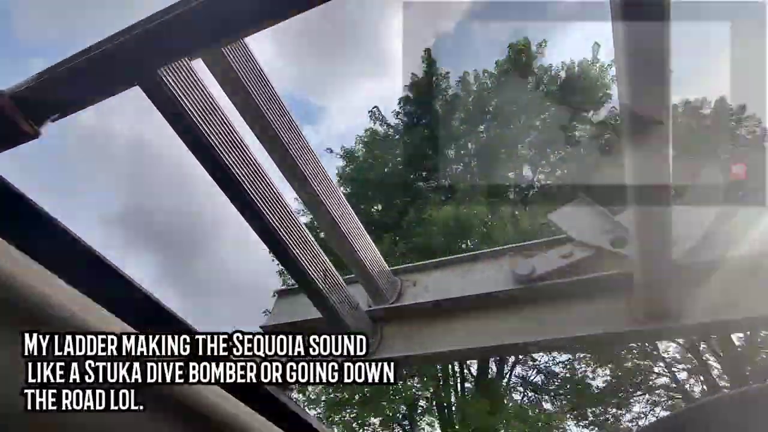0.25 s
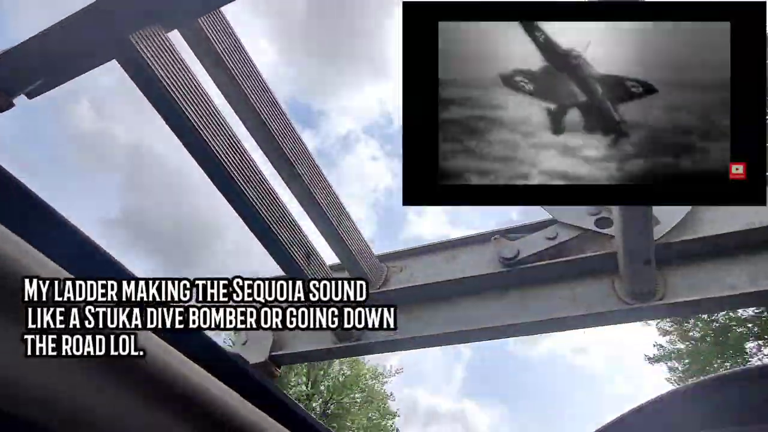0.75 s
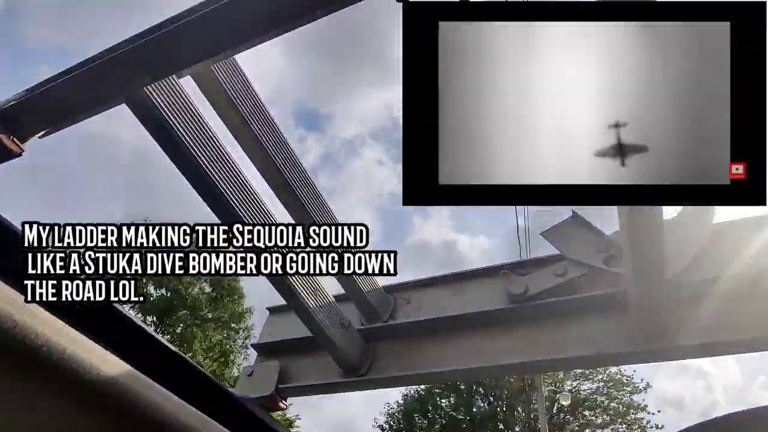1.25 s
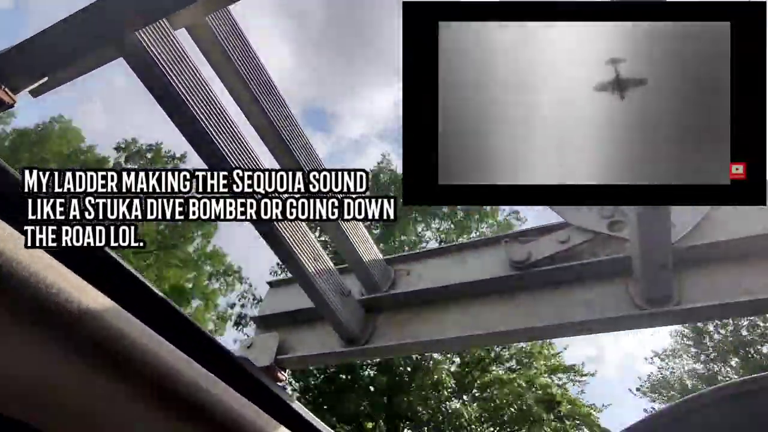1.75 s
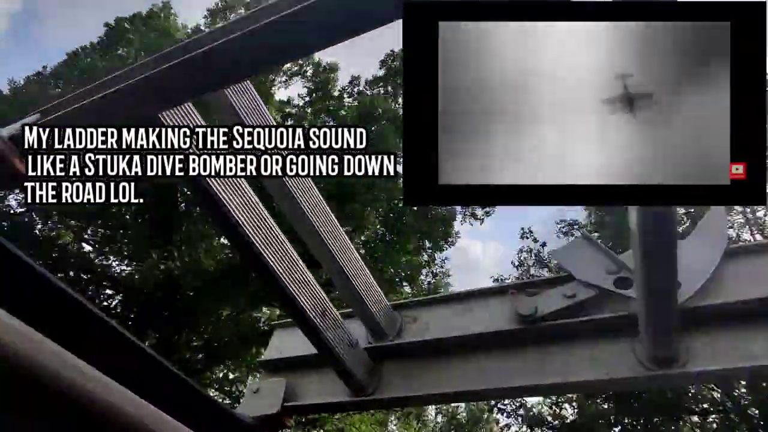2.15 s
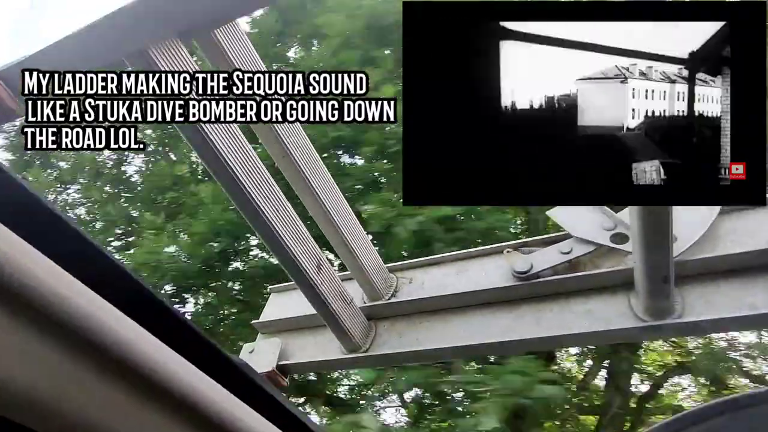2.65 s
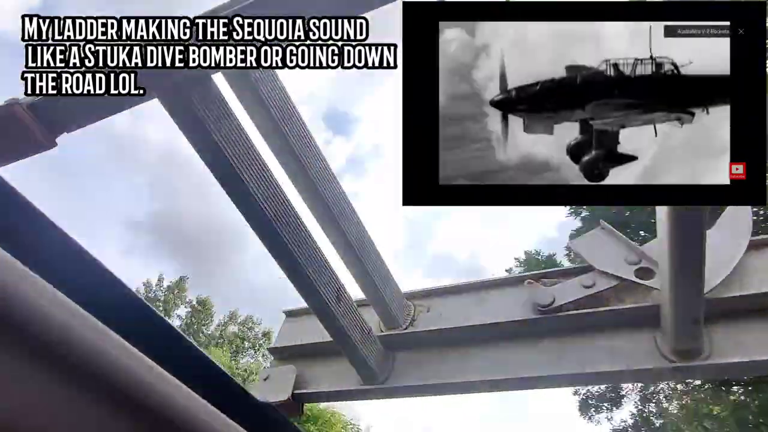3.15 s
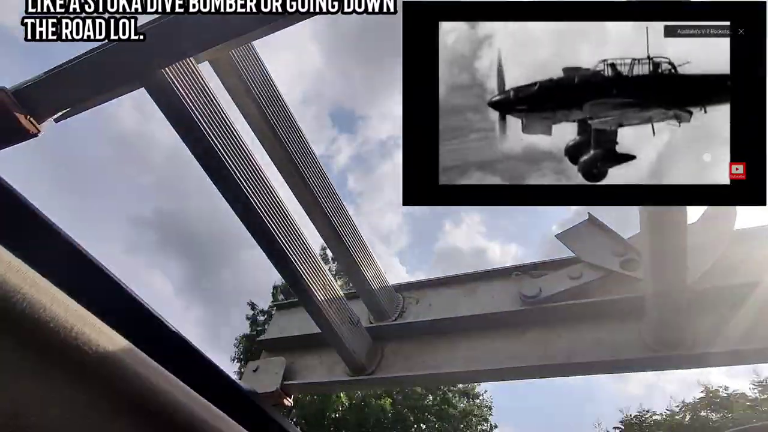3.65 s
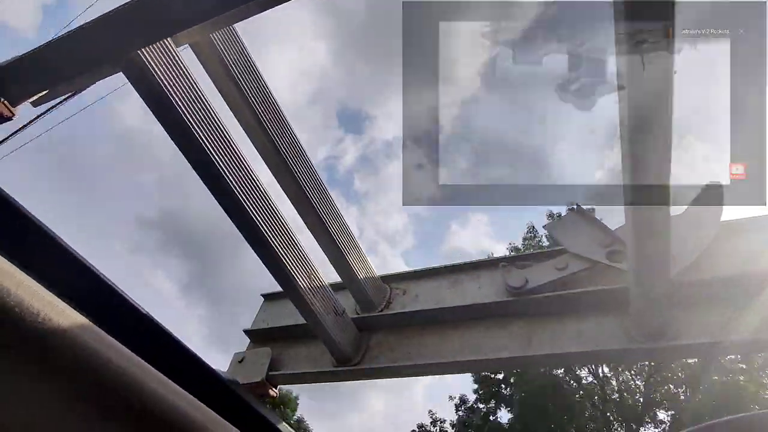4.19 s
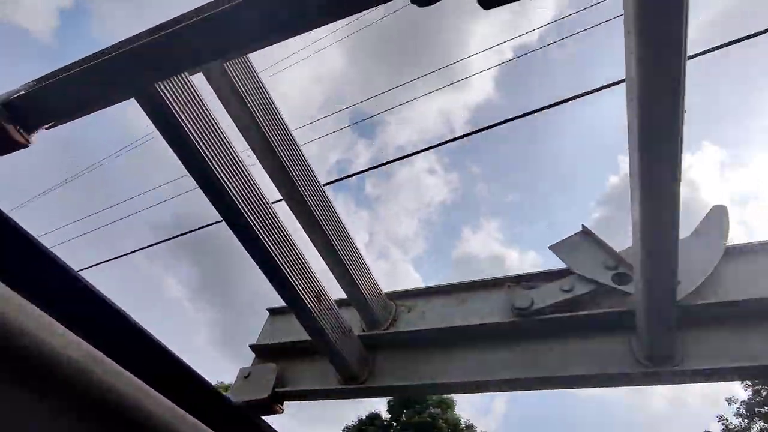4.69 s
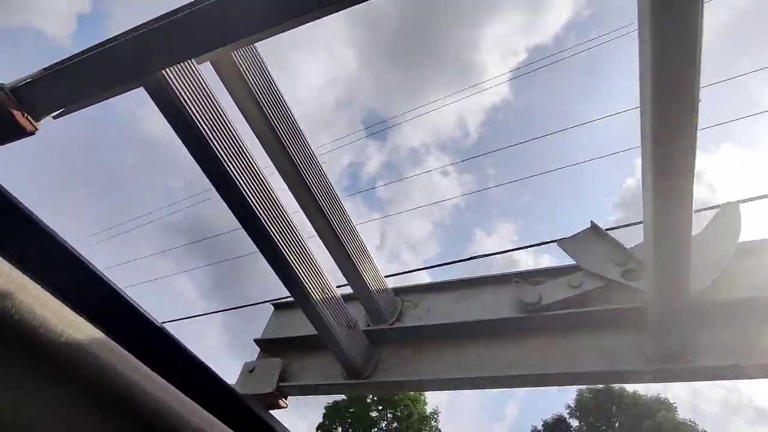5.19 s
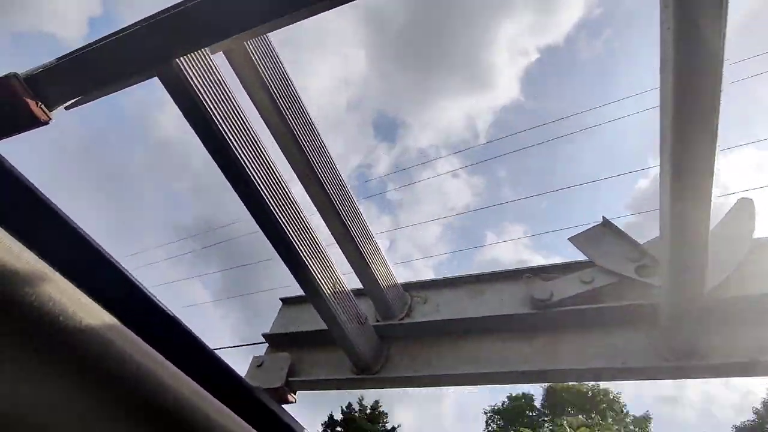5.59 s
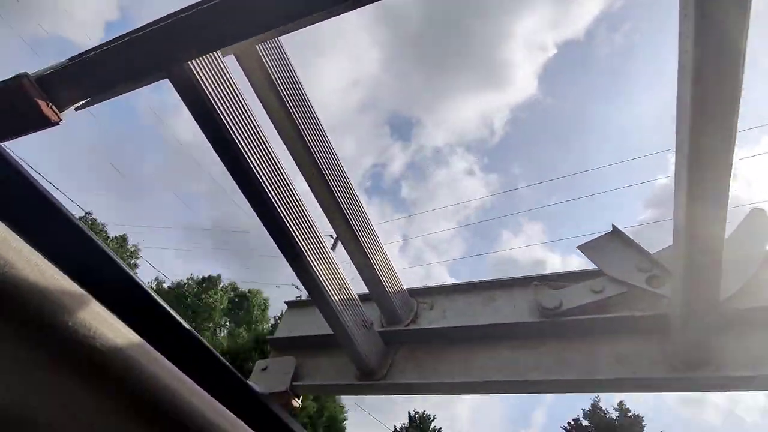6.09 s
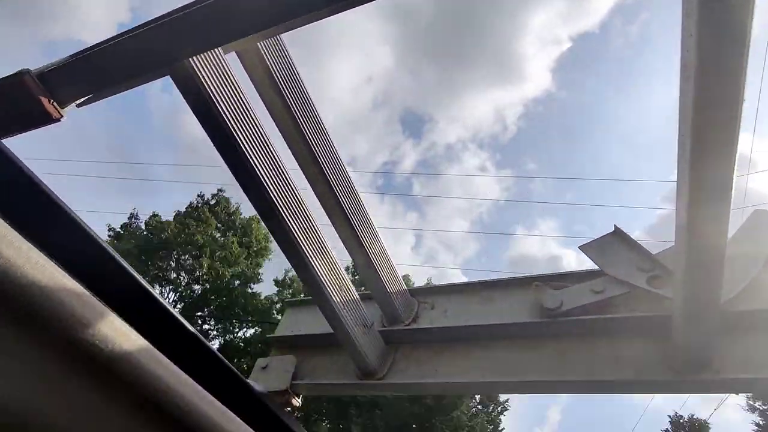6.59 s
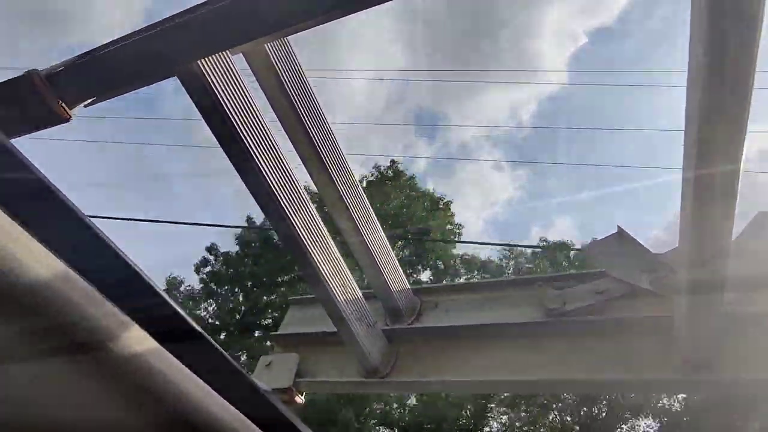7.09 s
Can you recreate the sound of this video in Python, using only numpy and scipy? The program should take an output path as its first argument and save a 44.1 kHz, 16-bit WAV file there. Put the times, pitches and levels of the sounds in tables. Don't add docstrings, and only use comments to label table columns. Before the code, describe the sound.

Inside a moving car with an open roof, wind blows across a metal ladder overhead and its hollow rungs hum a steady, slowly pulsing mid-pitched whistle. Air roars throughout over low engine drone and cabin boom. Gusts thump the phone's microphone from early on, the octave of the whistle flares around five seconds, and the heaviest slaps come last, mostly on the right.

```python
import sys
import numpy as np
from scipy import signal
from scipy.fft import rfft, irfft
from scipy.io import wavfile
from scipy.ndimage import uniform_filter1d

SR = 44100
rng = np.random.default_rng(int(sys.argv[2]) if len(sys.argv) > 2 else 0)


def attenuation_scalar(level_db):
    decades = np.asarray(level_db, float) / 20
    return 10 ** decades


def master_out(mix):
    frames = np.transpose(np.atleast_2d(mix))
    ceiling = np.clip(frames, -1, 1)
    pcm = np.round(ceiling * 32767).astype(np.int16)
    wavfile.write(sys.argv[1], SR, pcm)


N = 323635
TIME = np.arange(N) / SR
PORT_SIGN = np.array([[.5], [-.5]])


def curves(table):
    s, *columns = np.transpose(table)
    return [np.interp(TIME, s, c) for c in columns]


def unit(x):
    return x / np.sqrt(np.mean(x ** 2))


def walk(rate):
    k = int(SR / rate)
    held = np.repeat(rng.standard_normal(N // k + 1), k)
    return unit(uniform_filter1d(uniform_filter1d(held, k), k)[:N])


def port_walks(rate):
    return np.array([walk(rate), walk(rate)])


def colour(x, hz, db):
    f = np.log(np.maximum(np.fft.rfftfreq(N, 1 / SR), 1))
    points = np.log(np.r_[hz[0] / 2, hz, hz[-1] * 2])
    levels = np.r_[db[0] - 40, db, db[-1] - 40]
    return irfft(rfft(x) * attenuation_scalar(np.interp(f, points, levels)), N)


def sides(db, pan_db):
    ratio = attenuation_scalar(pan_db)
    return 2 * attenuation_scalar(db) * np.array([ratio * np.ones(N), np.ones(N)]) / (1 + ratio)


def pair(alike):
    shared, left, right = rng.standard_normal((3, N))
    return np.sqrt(alike) * shared + np.sqrt(1 - alike) * np.array([left, right])


def bursts(table, idle_db, idle_value=0.):
    power = attenuation_scalar(2 * idle_db) * np.ones(N)
    blend = power * idle_value
    for s, db, length, *value in table:
        bell = attenuation_scalar(2 * db) * np.exp(-2 * ((TIME - s) / (.5 * length)) ** 2)
        power = power + bell
        blend = blend + bell * sum(value)
    return 10 * np.log10(power), blend / power


def ducking():
    # start in seconds, depth in dB
    ducks = np.array([
        (1.56, 5.5),
        (3.38, 1.5),
        (4.08, 3.5),
        (5.1, 2.5),
        (5.49, 2.5),
        (5.82, 3.5),
        (6.15, 2),
        (6.7, 2.5),
        (7.1, 2),
    ])
    drop_s, recover_s = 0.024, 0.45
    after = np.maximum(TIME - ducks[:, :1], 0)
    return -ducks[:, 1] @ ((1 - np.exp(-after / drop_s)) * np.exp(-after / recover_s))


def roar():
    # frequency in Hz, left level in dB per Hz, right level in dB per Hz
    air_spectrum = [(289, -69, -59.5), (590, -64.5, -65), (975, -70.5, -66.5), (1460, -72, -72.5),
                    (2180, -73, -71), (2640, -81.5, -74), (3680, -83, -77.5), (5360, -80.5, -75.5),
                    (6440, -87, -70), (7330, -82.5, -85.5), (8640, -87, -91), (11900, -93.5, -88.5),
                    (13000, -95, -87.5), (15000, -102, -86)]
    # peak time in seconds, added power in dB relative to the steady roar, length in seconds
    swells = [
        (1.33, -3, .45),
        (2.95, -7.5, 0.44),
        (3.8, -1, 0.13),
        (5.0, -2, 0.42),
        (5.75, -2.5, 0.21),
        (6.62, -5.5, .3),
    ]
    left_depth = .6
    left_lag = 13
    db = (bursts(swells, 0.)[0] + ducking()) * np.array([[left_depth], [1]])
    hz, *spectra = np.transpose(air_spectrum)
    left, right = pair(0.16)
    noises = (np.roll(left, left_lag), right)
    air = [rfft(colour(x, hz, s)) for x, s in zip(noises, spectra)]
    octaves = np.log2(np.fft.rfftfreq(N, 1 / SR) + 1)
    out = 0
    for octave in np.arange(7, 15):
        band = irfft(air * np.maximum(1 - abs(octaves - octave), 0), N)
        flicker_db = 0.63 * np.array([walk(10), walk(12)]) + .5 * walk(25)
        out = out + band * attenuation_scalar(flicker_db)
    return attenuation_scalar(43.0) * attenuation_scalar(db - db.mean(axis=1, keepdims=True)) * out


def engine():
    # time in seconds, frequency in Hz, level in dB
    firing = [(0, 125.8, -19.5), (.6, 124.5, -21.5), (.9, 124.4, -24), (1.35, 124, -22), (1.6, 123.5, -33),
              (2.0, 123, -33.5), (2.15, 122.5, -28), (2.9, 121.5, -32.5), (3.4, 120.5, -33.5),
              (4.1, 118.5, -38.5), (4.4, 117.3, -28.5), (4.95, 116.3, -21), (5.7, 114.8, -24),
              (6.5, 113.3, -25), (7.34, 112.2, -23)]
    cabin_hz, cabin_width_hz, cabin_db, cabin_fade_db_per_s = 245, 60, -39, 0.84
    hz, db = curves(firing)
    right_lead = np.array([[0], [.36]])
    turn = 2 * np.pi * np.cumsum(hz + .3 * walk(6)) / SR + right_lead
    drone = sides(db + 1.53 * walk(16), -0.5) * np.sqrt(2) * np.sin(turn)
    mode = 2 * np.pi * cabin_hz * TIME
    cabin = walk(cabin_width_hz) * np.sin(mode) + walk(cabin_width_hz) * np.cos(mode)
    return drone + attenuation_scalar(cabin_db - cabin_fade_db_per_s * (TIME - 3.5)) * cabin


def buffet():
    # peak time in seconds, peak in dB, length in seconds, left minus right in dB
    surges = [(0.0, -17, .1, -3), (.26, -18, 0.15, 2), (.45, -18.5, .1, -4), (.95, -17.5, 0.26, -4),
              (1.31, -13, 0.11, -6), (1.53, -14, 0.17, -14), (1.68, -12, 0.047, 17), (1.78, -15, .06, 1),
              (2.32, -14.5, 0.06, -2), (2.49, -19.5, 0.069, -1), (2.72, -18.5, 0.16, 5),
              (2.98, -17.5, .09, -3.5), (3.23, -13, .08, 4), (3.33, -14, .09, 0), (3.64, -18, 0.1, 9),
              (3.82, -20, 0.13, -10), (3.96, -14.5, .12, -4), (4.07, -12.5, .1, -14.5),
              (4.27, -21, 0.095, -7), (4.6, -17.5, 0.14, 1), (4.87, -15.5, 0.076, -6),
              (5.09, -13, 0.17, -3), (5.29, -13.5, 0.078, -2), (5.48, -18.5, 0.086, -8),
              (5.66, -12, 0.046, -5), (5.8, -16, 0.085, -7), (6.15, -19, 0.207, -6), (6.7, -15, 0.1, 14),
              (6.89, -16.5, 0.13, 0), (7.05, -20, 0.19, -12)]
    # frequency in Hz, left level in dB per Hz, right level in dB per Hz
    boom_spectrum = [(19, -33.5, -27.5), (30, -33, -32), (39.4, -32.5, -28), (49.3, -39, -35),
                     (62, -43.5, -35), (90.6, -43.5, -43.5), (155, -52, -46.5), (227, -56, -52),
                     (350, -62.5, -59.5), (617, -65.5, -61), (1280, -74, -72)]
    db, pan_db = bursts(surges, -21.5, -5.5)
    hz, *spectra = np.transpose(boom_spectrum)
    pump, eddies = pair(0.6), pair(0.29)
    common = 1 / (1 + (np.fft.rfftfreq(N, 1 / SR) / 53.5) ** 4)
    air = irfft(np.sqrt(common) * rfft(pump) + np.sqrt(1 - common) * rfft(eddies), N)
    boom = np.array([colour(x, hz, s) for x, s in zip(air, spectra)])
    low = signal.sosfiltfilt(signal.butter(2, 95., fs=SR, output="sos"), boom)
    swell = sides(db - db.mean(), pan_db - pan_db.mean())
    loudness = uniform_filter1d(low ** 2, 5000) / np.mean(low ** 2, axis=1, keepdims=True)
    steady = low / np.sqrt(loudness + 0.19)
    return attenuation_scalar(43.5) * swell * steady + attenuation_scalar(41.0) * swell ** 0.41 * (boom - low)


def port_slaps(table):
    # frequency in Hz, level in dB per Hz
    thump_spectrum = [(40, -10.5), (100, 4.5), (250, -6), (500, -12.5), (1000, -25.5), (2500, -47),
                      (6000, -79)]
    dull, bright = np.zeros(N), np.zeros(N)
    for s, db, length, bright_db in table:
        shape = attenuation_scalar(db) * np.exp(-((TIME - s) / (.5 * length)) ** 2)
        dull += shape
        bright += shape * attenuation_scalar(bright_db)
    struck = rng.random(N) < 420 / SR
    steps = rng.standard_normal(N) * struck * attenuation_scalar(3.2 * rng.standard_normal(N))
    thump = unit(colour(steps, *np.transpose(thump_spectrum)))
    thump /= np.sqrt(uniform_filter1d(thump ** 2, size=2600) + 0.1)
    low = signal.sosfiltfilt(signal.butter(2, 420., fs=SR, output="sos"), thump)
    return attenuation_scalar(2.5) * (dull * low + bright * (thump - low))


def gusts():
    # peak time in seconds, level in dB, length in seconds, brightness in dB
    left_gusts = [(0.126, -24, 0.035, 3), (0.466, -25, 0.12, -3), (0.624, -24, 0.051, 1.8),
                  (1.414, -32, 0.04, 6), (1.595, -26, 0.057, 6), (1.675, -29, 0.036, 0),
                  (1.756, -24, 0.061, -4), (2.599, -20.5, 0.051, -4), (2.819, -27, 0.088, -3),
                  (3.221, -23.5, 0.14, 3), (3.609, -25, 0.052, -7), (5.216, -24, 0.093, -7),
                  (5.354, -23.5, 0.07, -7), (6.288, -26, 0.037, -1), (6.675, -13, 0.051, 1.5)]
    right_gusts = [(0.232, -16.5, 0.043, -3), (0.45, -22.8, 0.086, 1.8), (1.567, -19.5, 0.16, -1),
                   (1.84, -26, 0.12, 3), (2.22, -19.5, 0.14, -16), (2.465, -20.5, 0.043, -3),
                   (2.833, -21, 0.047, -10), (3.117, -19, 0.063, -7), (3.344, -21.3, 0.04, -7),
                   (3.842, -23, 0.052, -1), (4.09, -16, 0.085, -4), (4.825, -24, 0.046, 1.3),
                   (5.126, -22, 0.13, 7), (5.277, -22, 0.074, -11), (5.5, -19, 0.036, -12),
                   (5.616, -18, 0.023, -1), (5.82, -12.5, 0.1, -6), (6.168, -20, 0.104, -19),
                   (6.304, -17.5, 0.028, -11), (6.563, -14.5, 0.07, -2.5), (6.704, -11.5, 0.067, -7),
                   (7.05, -14.5, 0.05, -16), (7.135, -13, 0.029, -16),
                   (5.91, -29, 0.024, 3.7),
        (6.6, -22, 0.036, 4.3),
        (6.955, -17.5, 0.019, 4),
        (7.0, -19, 0.04, 0),
    ]
    return np.array([port_slaps(left_gusts), port_slaps(right_gusts)])


def ragged(hz, db, rough, rate, lead, pan_db):
    turn = 2 * np.pi * np.cumsum(hz) / SR + lead * PORT_SIGN
    a, b = rough * port_walks(rate), rough * port_walks(rate)
    level = sides(db, pan_db) * np.sqrt(2 / (1 + 2 * rough ** 2))
    return level * ((1 + a) * np.sin(turn) + b * np.cos(turn))


def neighbour_rung():
    # peak time in seconds, peak in dB, length in seconds
    catches = [(0, -29, 0.082), (.33, -28, 0.46), (1.05, -34, 0.33), (1.36, -27.5, 0.24), (2.42, -34, .3),
               (2.85, -37, .3), (3.3, -41, .25), (3.9, -34, 0.22), (4.7, -39, 0.54), (5.25, -38, .2),
               (5.75, -35, .2), (7.0, -39, .15), (7.34, -41, .1)]
    hz = 448.8 + .9 * walk(3)
    return ragged(hz, bursts(catches, -42)[0], rough=0.4, rate=12, lead=0.28, pan_db=-1.5)


def octave_flares(hz):
    # peak time in seconds, peak in dB, length in seconds
    flares = [(.27, -34.5, 0.4), (.85, -37, 0.23), (1.35, -41, 0.65), (2.05, -39, .15), (2.45, -40, .2),
              (3.15, -38.5, 0.36), (3.95, -38, 0.39), (4.55, -33, .3), (5.1, -31.5, 0.49),
              (5.7, -35.5, 0.67), (6.5, -38.5, .5), (7.05, -43, .5)]
    return ragged(2 * hz, bursts(flares, -43.5)[0], rough=0.54, rate=28, lead=0.63, pan_db=-5.0)


def loose_resonances(turn):
    # multiple of the rung pitch, width in Hz, level in dB
    resonances = [
        (2.04, 45, -41.5),
        (2.15, 40, -45.5),
        (3.0, 10, -50.5),
        (3.05, 40, -54),
    ]
    out = 0
    for multiple, width, db in resonances:
        a, b = port_walks(width), port_walks(width)
        out = out + attenuation_scalar(db) * unit(a * np.sin(multiple * turn) + b * np.cos(multiple * turn))
    return out


def whistle():
    # time in seconds, level in dB, share of the lower rung, beat in turns (they cancel at whole turns)
    rungs = [(0.0, -23, 0.41, 0.01), (0.67, -22.0, 0.88, 0.91), (1.06, -23.2, 0.32, 1.48),
             (1.37, -16.9, 0.75, 2.05), (1.64, -26, 0.52, 2.31), (2.18, -24, 0.94, 2.78),
             (3.2, -21.5, 0.38, 3.88), (3.69, -27.5, 0.16, 5.46), (3.86, -20.0, 0.0, 6.1),
             (4.22, -26.0, 0.36, 5.97), (4.88, -21.5, 0.21, 7.4), (5.4, -23, 0.083, 7.1),
             (5.48, -24.6, 0.0, 8.31), (5.97, -27.0, 0.3, 9.22), (6.34, -28.0, 0.095, 10.6),
             (6.63, -22.5, 0.2, 11.68), (6.75, -27.5, 0.0, 12.4), (7.34, -25, 0.37, 12.98)]
    rung_hz, sag_hz_per_s = 423.1, .4
    port_gap_rad, rung_lead_rad = 1.05, 0.5
    rung_pan_db, left_share, flutter_db = -1.5, 0.97, 1.1
    db, share, turns = curves(rungs)
    hz = rung_hz - sag_hz_per_s * TIME
    turn = 2 * np.pi * np.cumsum(hz + 0.35 * walk(20) + 0.29 * walk(4.99)) / SR
    upper = turn + rung_lead_rad * PORT_SIGN
    lower = upper + np.pi - 2 * np.pi * turns - port_gap_rad * PORT_SIGN
    flutter = flutter_db * np.array([walk(20), walk(22)])
    level = attenuation_scalar(db + 2.0 + rung_pan_db * PORT_SIGN + flutter)
    lower_share = share * left_share ** (2 * PORT_SIGN)
    beating = level * np.sqrt(2) * (np.sin(upper) + lower_share * np.sin(lower))
    return beating + neighbour_rung() + octave_flares(hz) + loose_resonances(turn)


def scene():
    return roar() + engine() + buffet() + gusts() + whistle()


def thin_treble(x, edge_hz):
    keep, edge_step_hz = .95, 690
    framing = dict(nperseg=2048, noverlap=1024, window="cosine")
    f, t, z = signal.stft(x, SR, **framing)
    usual = uniform_filter1d(uniform_filter1d(abs(z), size=32, axis=0), size=9, axis=1)
    weak = (uniform_filter1d(abs(z), size=3, axis=0) < keep * usual) & (f[:, None] > 7400)
    jumps = np.round(1.1 * uniform_filter1d(rng.standard_normal(len(t)), size=2))
    edge = edge_hz + edge_step_hz * jumps
    z[weak | (f[:, None] > edge)] = 0
    return signal.istft(z, SR, **framing)[1][:N]


def top_cut(x):
    return signal.sosfilt(signal.butter(12, 15350, fs=SR, output="sos"), x)


def record(dry):
    top = 1.05
    rounded = top * np.tanh(dry / top)
    edges_hz = (12400, 13600)
    mix = np.array([thin_treble(x, hz) for x, hz in zip(rounded, edges_hz)])
    return top_cut(mix)


dry = scene()
out = record(dry)
master_out(out)
```